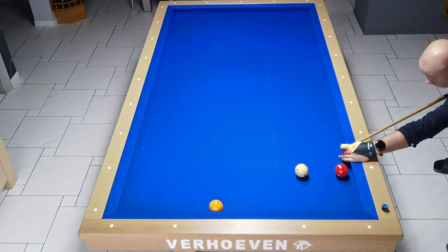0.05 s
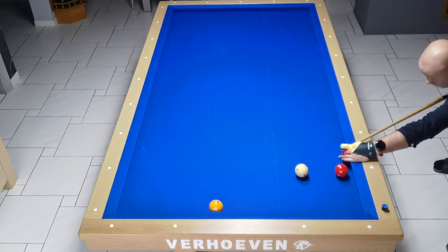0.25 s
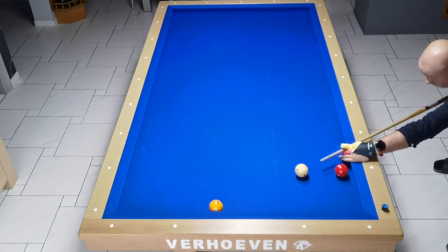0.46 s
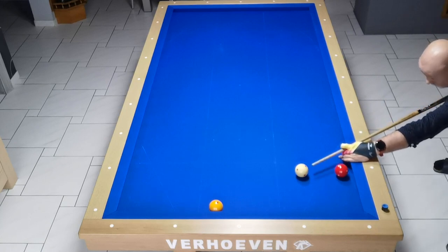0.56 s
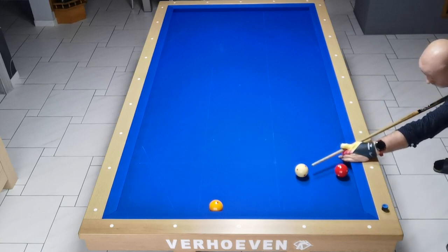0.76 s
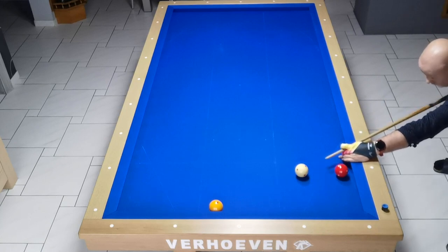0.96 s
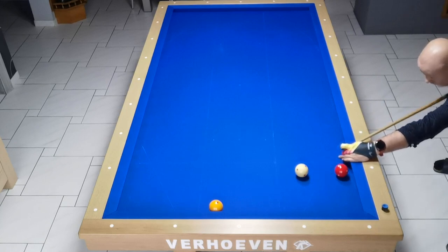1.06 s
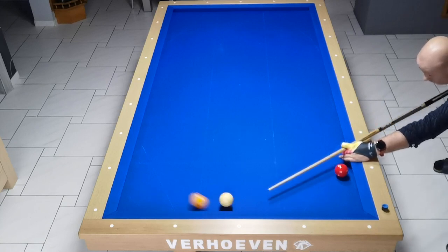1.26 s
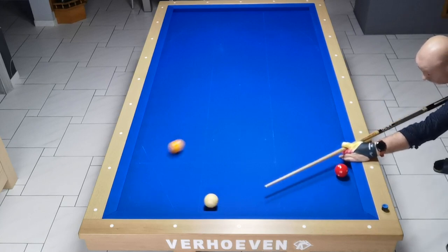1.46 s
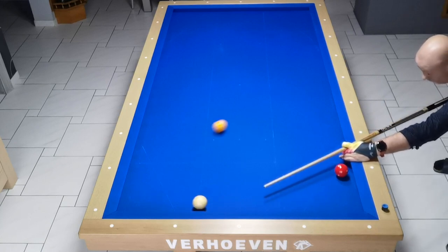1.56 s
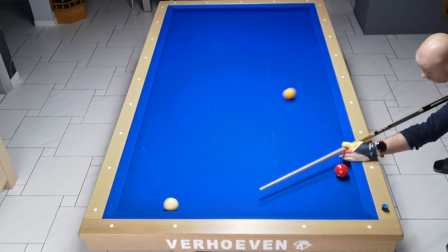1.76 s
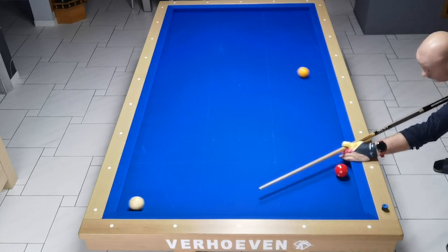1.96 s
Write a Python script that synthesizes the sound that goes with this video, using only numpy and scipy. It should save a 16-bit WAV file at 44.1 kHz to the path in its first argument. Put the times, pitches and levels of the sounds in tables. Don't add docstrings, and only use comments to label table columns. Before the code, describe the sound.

After over a second of faint hum and hiss, a cue tip raps a ball, which cracks against another; soft low rail thuds and faint rolling follow under a lively indoor reverberation, in stereo.

```python
import sys
import numpy as np
from scipy import signal
from scipy.io import wavfile

SR = 44100
rng = np.random.default_rng(int(sys.argv[2]) if len(sys.argv) > 2 else 0)


def transcribe(signal):
    frames = np.atleast_2d(signal).T
    limited = np.clip(frames, -1, 1)
    pcm = np.round(limited * 32767).astype(np.int16)
    wavfile.write(sys.argv[1], SR, pcm)


def invert_db(level):
    return 10 ** (np.asarray(level, dtype=float) / 20)


N = 88596

STRIKE_S, CONTACT_S = 1.29065, 0.0027

# centre_s, pitch_hz, length_cycles, peak_db, left_right_db
CLICK = [
    (1.37295, 3200, 1, -12, 2),
    (1.37305, 12950, 6.6, -24, 9),
    (1.37435, 2870, 1.9, -12.5, 5),
    (1.37445, 12000, 7.8, -25, 6),
    (1.37425, 9250, 5.5, -27.5, 9),
    (1.37335, 1400, 1.5, -17, -7.5),
    (1.37555, 2700, 2.0, -22, 1),
]
# centre_s, pitch_hz, length_cycles, peak_db, left_right_db
CEILING = [
    (1.3793, 2900, 1.6, -14.5, 9),
    (1.38075, 1920, 1.1, -1.2, 3),
    (1.3859, 2000, 2.2, -20.5, 3),
    (1.3801, 11000, 8.0, -30.5, 4),
    (1.3797, 1800, 1.1, -19.5, -4),
]
# frequency_hz, likeness
TAIL_SAME = [(60, 0.97), (180, 0.95), (550, 0.67), (1650, 0.068), (4970, 0.053), (15000, 0.02)]
# frequency_hz, left_right_db
TAIL_LEAN = [(60, -4.5), (240, -1.5), (950, 4.5), (3770, 1.5), (15000, 6)]
# frequency_hz, likeness
AIR_SAME = [(60, 0.97), (180, 0.76), (550, 0.28), (1650, -0.24), (4970, -0.03), (15000, -0.04)]
# frequency_hz, left_right_db
AIR_LEAN = [(60, -4.5), (240, 0), (950, 4), (3770, 0.5), (15000, 5.5)]


def pan(left_right_db):
    return invert_db(left_right_db * np.array([[0.5], [-0.5]]))


def evened(x):
    return x / np.sqrt(np.mean(x ** 2) + 1e-20)


def read(points, hz):
    f, value = np.transpose(points)
    return np.interp(np.log(hz + 1), np.log(f + 1), value)


def curve(points):
    return invert_db(np.interp(np.arange(N) / SR, *np.transpose(points)))


def noise(colour, same, lean, size=1024, decay=False, dips=()):
    # frequency_hz, t60_s
    room_t60 = [(60, 1.2), (200, 0.96), (700, 0.68), (2000, 0.57), (4000, 0.56), (8000, 0.39),
                (13000, 0.35)]
    hop = size // 4
    frames, hz = N // hop + 5, np.fft.rfftfreq(size, 1 / SR)
    a, b, c, d = rng.standard_normal((frames, len(hz), 4)).T
    left, other = a + 1j * b, c + 1j * d
    alike = np.clip(read(same, hz), -1, 1)[:, None]
    right = alike * left + np.sqrt(1 - alike ** 2) * other
    tilt = read(lean, hz)[:, None] / 2
    z = np.array([left * invert_db(tilt), right * invert_db(-tilt)])
    dip_db = sum(db * np.exp(-((hz - f) / width) ** 2) for f, width, db in dips)
    z *= invert_db(read(colour, hz) + dip_db)[:, None]
    scale = np.sqrt(np.mean(signal.istft(z, nperseg=size, noverlap=size - hop)[1] ** 2))
    if decay:
        frame_s = np.arange(frames) * hop / SR
        z = z * invert_db(-60 * frame_s / np.maximum(read(room_t60, hz), 0.05)[:, None])
    return signal.istft(z, nperseg=size, noverlap=size - hop)[1][:, :N] / scale


def blows(rows, lag_s=0.0):
    out = np.zeros((2, N))
    for s, hz, cycles, db, pan_db in rows:
        at = round(s * SR) + np.arange(-700, 700)
        t = at / SR - s - np.array([[0], [lag_s]])
        swing = np.exp(-0.5 * (t * hz * 2 / cycles) ** 2) * np.cos(2 * np.pi * hz * t)
        out[:, at] += invert_db(db) * pan(pan_db) * swing
    return out


def tail(start, colour, db, dips=()):
    at = round(start * SR)
    t = np.arange(N - at) / SR
    wash = noise(colour, TAIL_SAME, TAIL_LEAN, size=512, decay=True, dips=dips)[:, :N - at]
    build = 1 - np.exp(-(t / 0.0022) ** 2)
    return np.pad(invert_db(db) * build * wash, ((0, 0), (at, 0)))


def cue_strike():
    # centre_s, pitch_hz, length_cycles, peak_db, left_right_db
    arrivals = [
        (1.2948, 2320, 2.3, -24.5, -2.5),
        (1.2985, 2300, 6.3, -24.5, 10),
        (1.3001, 916, 0.79, -15, 0),
        (1.2912, 10400, 5.0, -35.5, 6),
        (1.2922, 5400, 1.8, -31.5, -13.5),
        (1.3032, 5300, 7, -33, 1.5),
        (1.2990, 157, 2.1, -31.5, -2),
    ]
    t = np.maximum(np.arange(N) / SR - STRIKE_S, 0)
    grow = 0.42 + (1 - 0.42) * np.minimum(t / CONTACT_S, 1)
    let_go = np.exp(-(np.maximum(t - CONTACT_S, 0) / 0.00069) ** 2)
    swing = grow * let_go * np.sin(2 * np.pi * 774 * t)
    knock = signal.lfilter(*signal.butter(2, 220, "highpass", fs=SR), swing)
    slate_hz, slate_db, slate_t60_s = 62.6, -50, 5.1
    boom = invert_db(slate_db - 60 * t / slate_t60_s) * np.minimum(t / 0.043, 1)
    boom = boom * np.sin(2 * np.pi * slate_hz * t)
    return invert_db(-9) * pan(4) * knock + pan(-3) * boom + blows(arrivals)


def ball_click():
    return blows(CLICK)


def contact_cracks():
    # start_s, peak_db, t60_s, left_right_db
    bursts = [
        (1.2904, -33, 0.04, 0),
        (1.3717, -29.5, 0.01, 5.5),
        (1.3733, -26, .012, 2),
        (1.3791, -36, .012, 7),
    ]
    out, t = np.zeros((2, N)), np.arange(1024) / SR
    for (s, db, t60, pan_db), burst in zip(bursts, rng.standard_normal((len(bursts), 2, 1024))):
        out[:, round(s * SR):][:, :len(t)] += invert_db(db - 60 * t / t60) * pan(pan_db) * burst
    return signal.sosfilt(signal.butter(2, [1800, 13500], "bandpass", fs=SR, output="sos"), out)


def ceiling_echoes():
    return blows(CEILING, lag_s=0.0004)


def cushions():
    # start_s, pitch_hz, peak_db, t60_s
    thuds = [
        (1.459, 724, -23, 0.056),
        (1.462, 245, -35.5, 0.15),
        (1.51, 705, -32, 0.11),
        (1.531, 239.4, -36.5, 0.2),
        (1.575, 200.4, -39, 0.27),
        (1.601, 138.2, -40, 0.17),
        (1.715, 40, -46, .15),
        (1.383, 255.6, -33.5, 0.17),
    ]
    out, t = np.zeros((2, N)), np.arange(SR // 4) / SR
    for (s, hz, db, t60), draw in zip(thuds, rng.random((len(thuds), 12))):
        tune = hz * (1 + 0.603 * (draw[:4, None] - 0.5))
        phase = 2 * np.pi * draw[4:8, None]
        ports = [np.sin(2 * np.pi * tune * t + phase + k * draw[8:, None]).sum(0) / 2 for k in (0, 1)]
        ring = np.array(ports) * np.minimum(t * hz / 3, 1)
        ring *= invert_db(db - 60 * t / t60) * pan(3)
        part = out[:, round(s * SR):][:, :len(t)]
        part += ring[:, :part.shape[1]]
    return out


def table_body():
    # frequency_hz, level_db (per Hz)
    body_colour = [(55, -45), (90, -19), (178, -13), (259, -6.5), (450, -8.5), (540, -9.5), (730, 3.5),
                   (900, -3.5), (1100, -21.5), (1430, -43)]
    # time_s, level_db
    body_hold = [(1.30, 0.1), (1.45, 1), (1.60, 6.5), (1.68, -1.5)]
    return curve(body_hold) * tail(STRIKE_S + CONTACT_S, body_colour, -25.5)


def room_reverberation():
    # frequency_hz, level_db (per Hz)
    cue_colour = [(600, -32.5), (1050, -8.5), (1570, -14), (2240, -3), (4300, -20), (5600, -17.5),
                  (6700, -23.5), (13600, -27.5), (14800, -54)]
    # frequency_hz, level_db (per Hz)
    click_colour = [(530, -34), (900, -17), (1080, -14.5), (1450, -10.5), (2000, -0.5), (3570, -14),
                    (5000, -35.5), (6500, -60), (11000, -120)]
    # frequency_hz, level_db (per Hz)
    treble_colour = [(2900, -37.5), (5000, -8), (7200, -1.5), (9900, -1.5), (11400, -3), (13000, 3.5),
                     (13800, -4), (14300, -45.5)]
    # frequency_hz, width_hz, depth_db
    notches = [(5650, 130, -25), (8350, 200, -25), (11400, 220, -18)]
    wash = tail(STRIKE_S, cue_colour, -25.5, notches[1:])
    wash += tail(CEILING[0][0], click_colour, -20.5, notches)
    return wash + tail(CLICK[0][0], treble_colour, -42, notches)


def rolling():
    # frequency_hz, level_db (per Hz)
    roll_colour = [(12, -38), (20, -9.5), (64, -6), (182, -9), (222, -17.5), (259, -11.5), (520, -34.5),
                   (600, -17), (780, -54.5), (1320, -120)]
    # time_s, level_db
    roll_level = [(1.29, -101), (1.34, -62), (1.55, -42), (1.75, -57.5), (1.9, -62), (1.99, -60)]
    return curve(roll_level) * noise(roll_colour, AIR_SAME, AIR_LEAN, size=2048)


def shaft_slide():
    # time_s, level_db
    slide_level = [(1.17, -100), (1.23, -70), (1.285, -74.5), (1.30, -100)]
    # frequency_hz, level_db (per Hz)
    slide_colour = [(1500, -20.5), (3000, -2), (5000, -1.5), (7000, -6.5), (12000, -8.5), (16000, -20)]
    # time_s, pitch_hz
    squeak_pitch = [(1.20, 4500), (1.235, 5100), (1.285, 5300)]
    hiss = noise(slide_colour, TAIL_SAME, TAIL_LEAN, size=512)
    hz = np.interp(np.arange(N) / SR, *np.transpose(squeak_pitch))
    r = np.exp(-np.pi * 250 / SR)
    grain = rng.standard_normal((2, N)) + 1j * rng.standard_normal((2, N))
    slow = signal.lfilter([1], [1, -2 * r, r * r], grain)
    squeak = evened((slow * np.exp(2j * np.pi * np.cumsum(hz) / SR)).real)
    return curve(slide_level) * (hiss + invert_db(-8.5) * squeak)


def room_tone():
    # frequency_hz, level_db (per Hz)
    air_colour = [(15, 1.5), (70, -10.5), (140, -17), (900, -34.5), (2200, -34.5), (5000, -39),
                  (11500, -42.5), (12500, -50), (16000, -69.5)]
    # time_s, level_db
    air_lift = [(1.5, -4), (1.7, 2), (1.98, -1.5), (2.008, 1.5)]
    # frequency_hz, level_db
    hum_tones = [
        (100.0, -67.5),
        (355, -90),
        (163, -85.5),
    ]
    t = np.arange(N) / SR
    waver = sum(np.sin(2 * np.pi * (f * t + rng.random())) for f in np.geomspace(0.5, 6, 8)) / 2
    hum = sum(np.sqrt(2) * invert_db(db + 0.8 * waver) * np.sin(2 * np.pi * hz * t) for hz, db in hum_tones)
    air = invert_db(-61.5) * curve(air_lift) * noise(air_colour, AIR_SAME, AIR_LEAN, size=2048)
    return air + pan(-3) * hum


def scene():
    # time_s, level_db
    recorder_gain = [(1.30, -0.6), (1.40, 0.12), (1.50, 5), (1.60, 8), (1.66, 6.5), (1.75, 4.7)]
    hits = cue_strike() + ball_click() + contact_cracks() + ceiling_echoes()
    ringing = cushions() + table_body() + room_reverberation()
    return hits + curve(recorder_gain) * ringing + rolling() + shaft_slide() + room_tone()


def low_pass(x):
    return signal.sosfilt(signal.butter(12, 16530, fs=SR, output="sos"), x)


def record(dry):
    return low_pass(dry)


dry = scene()
out = record(dry)
transcribe(out)
```